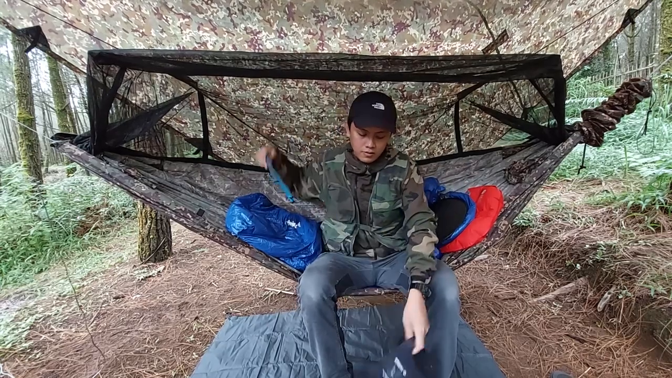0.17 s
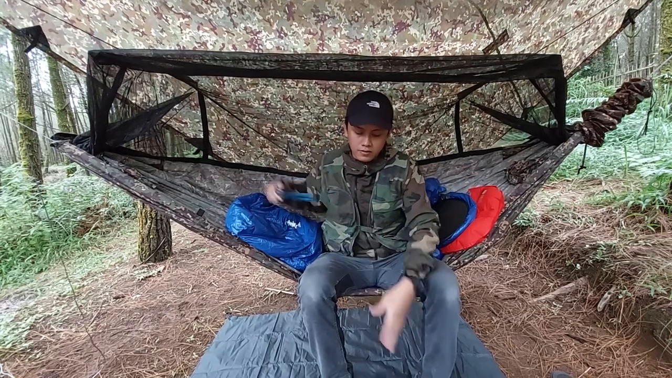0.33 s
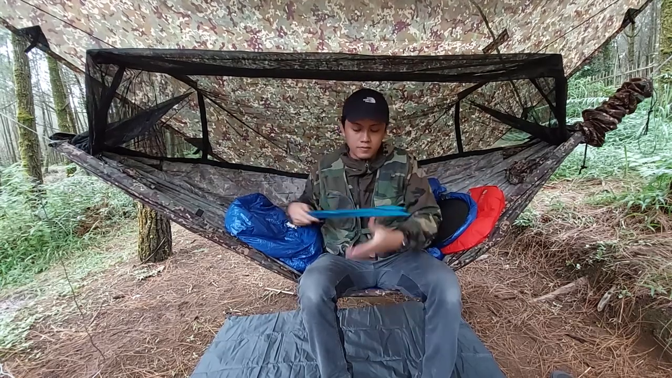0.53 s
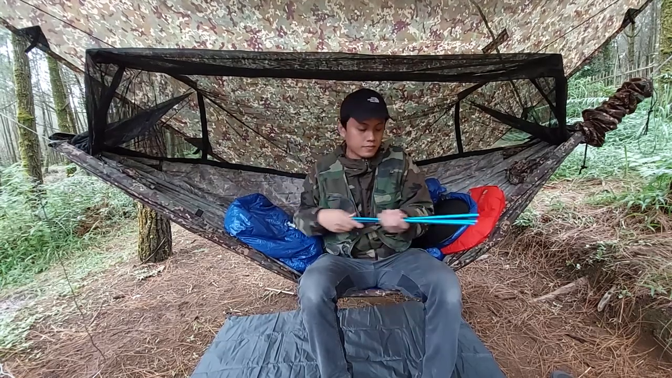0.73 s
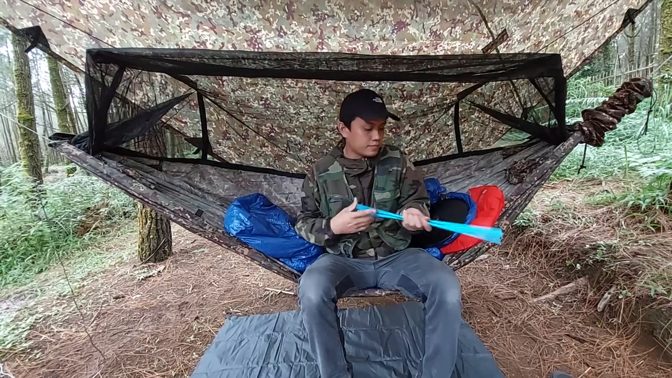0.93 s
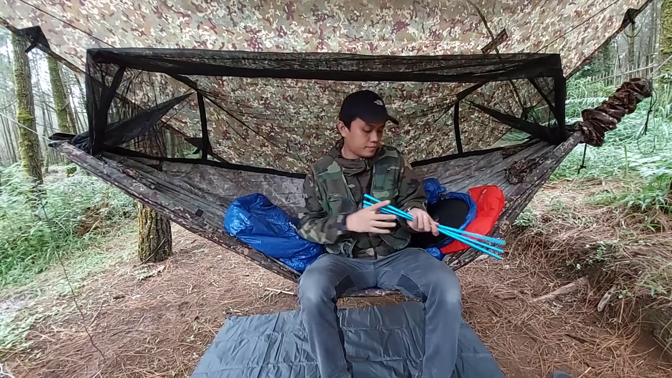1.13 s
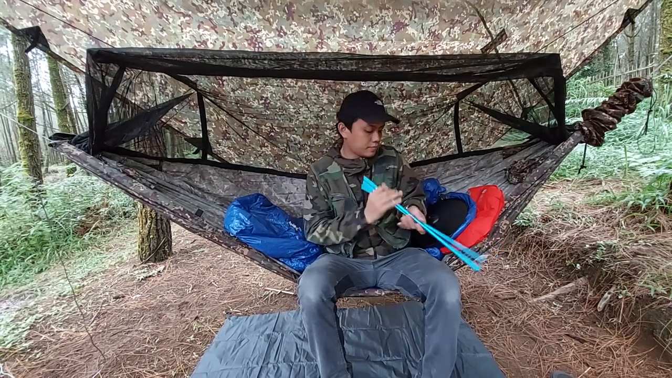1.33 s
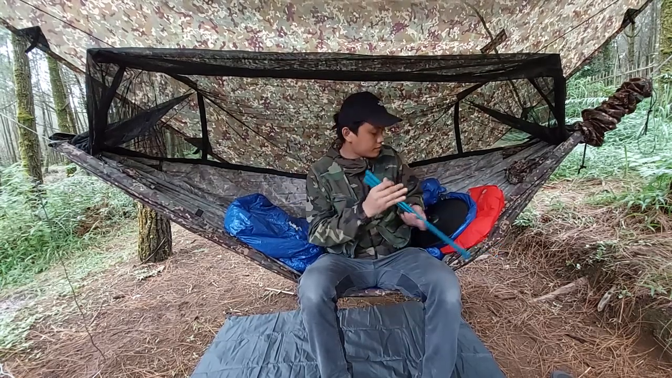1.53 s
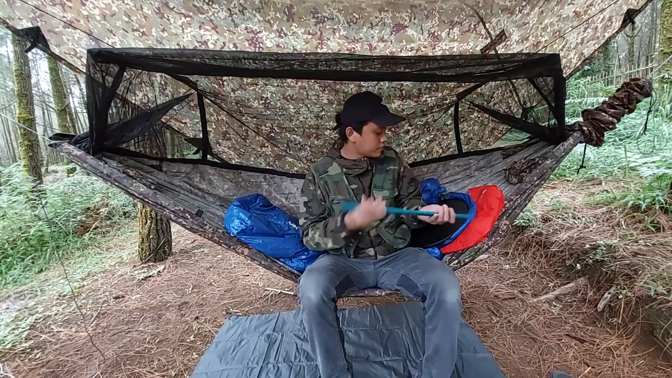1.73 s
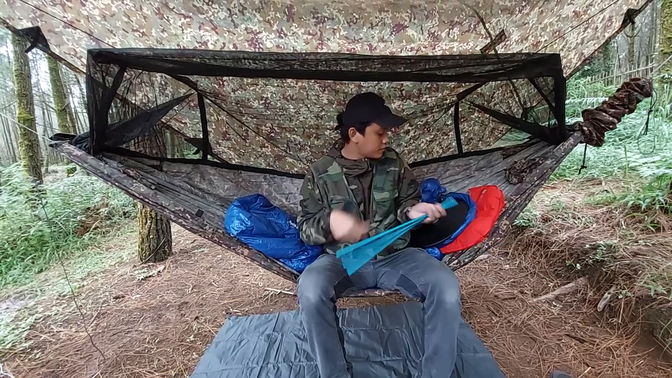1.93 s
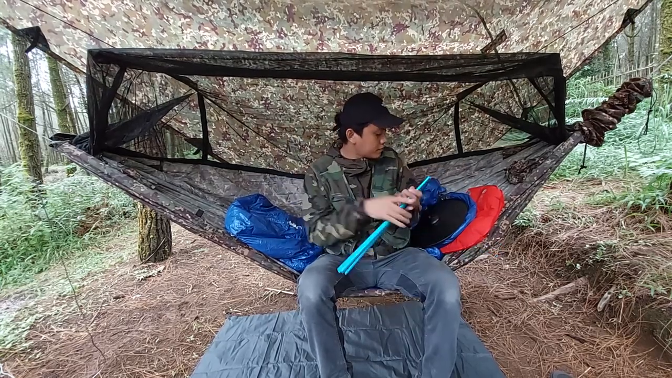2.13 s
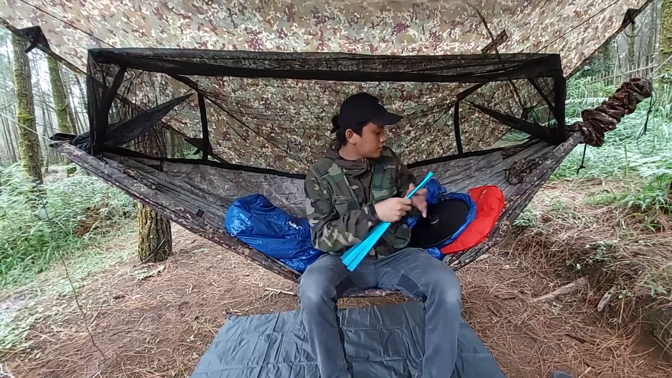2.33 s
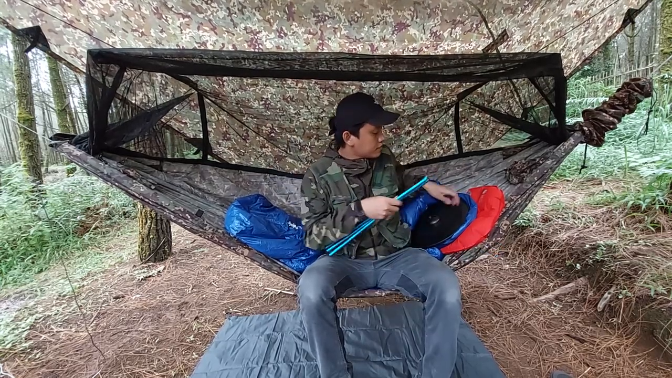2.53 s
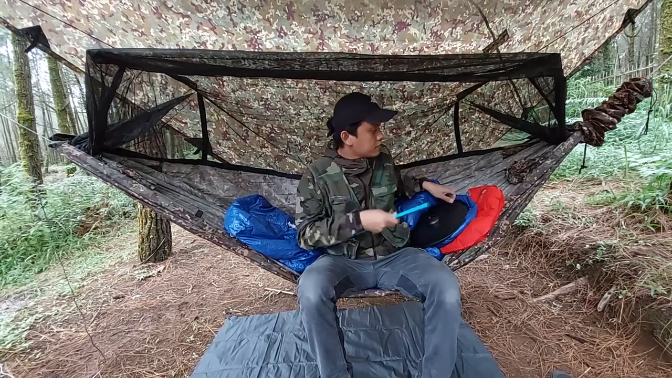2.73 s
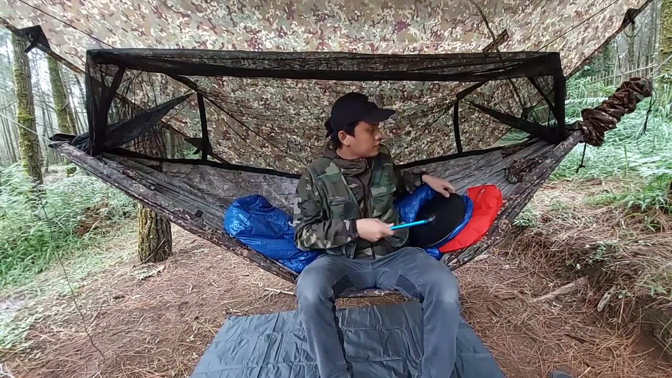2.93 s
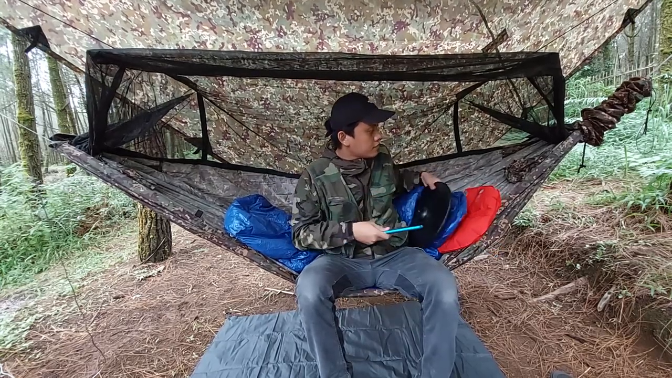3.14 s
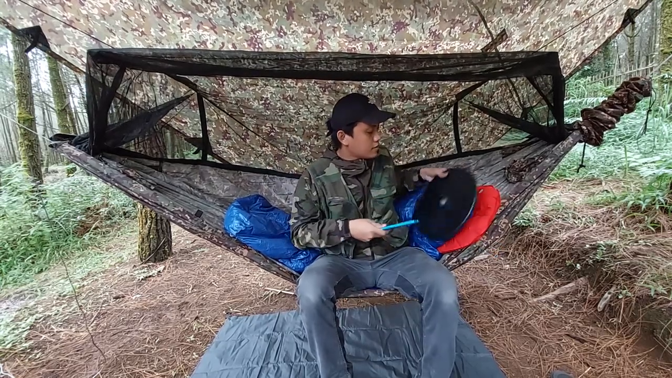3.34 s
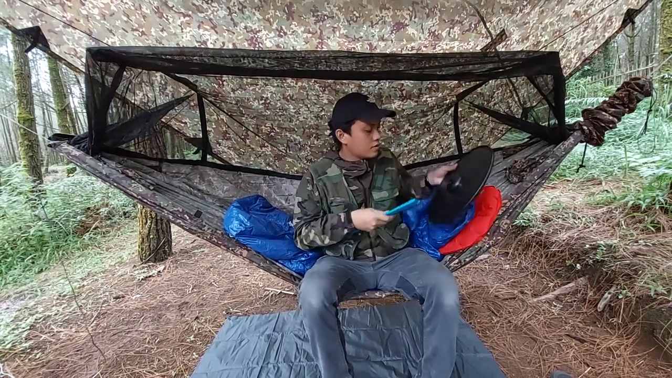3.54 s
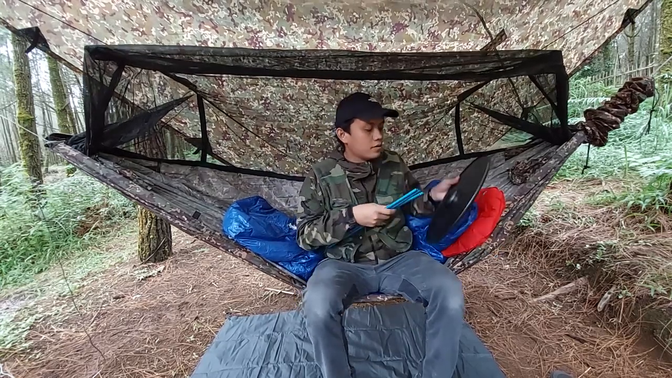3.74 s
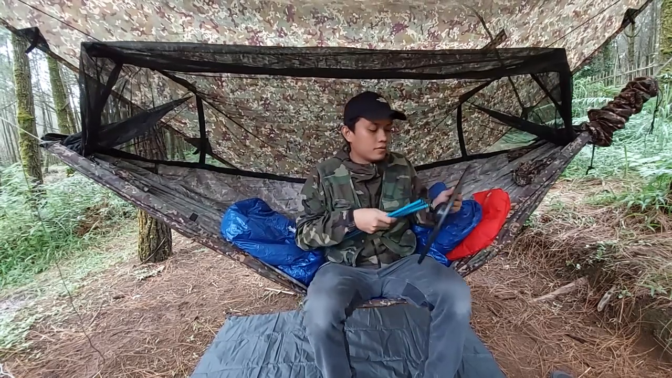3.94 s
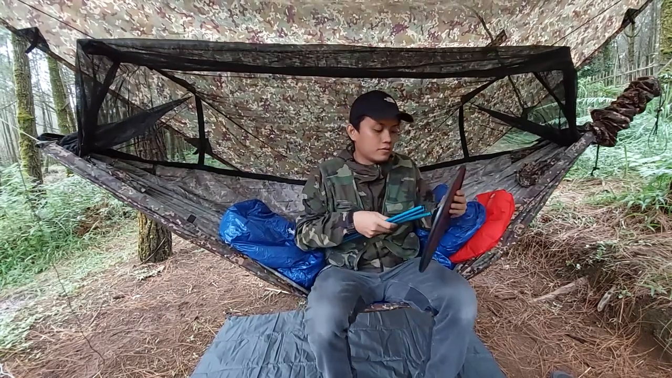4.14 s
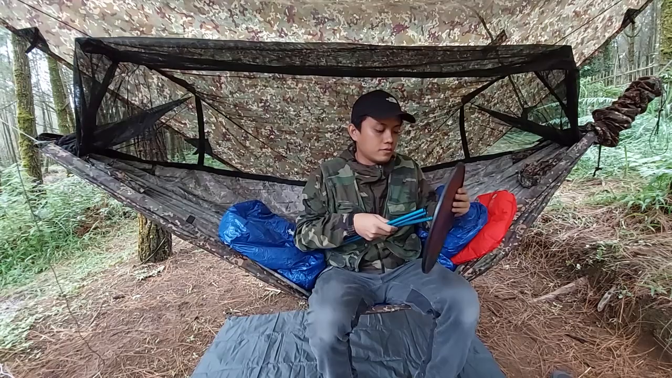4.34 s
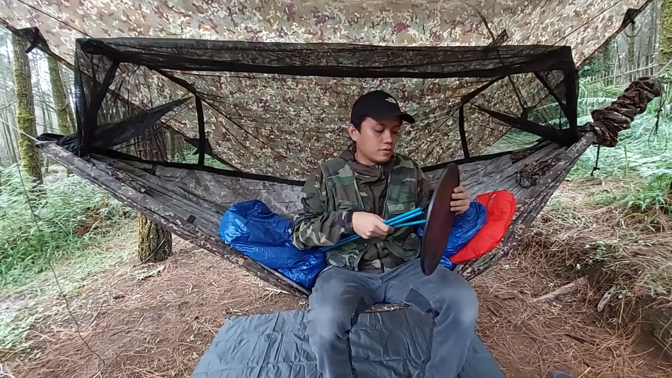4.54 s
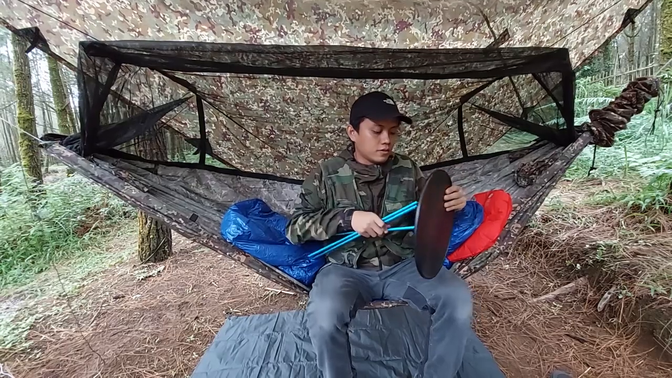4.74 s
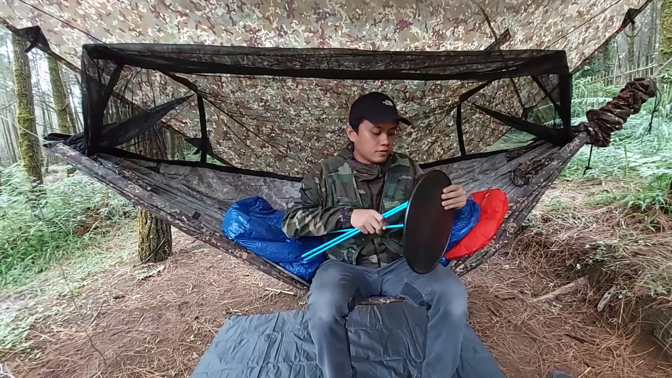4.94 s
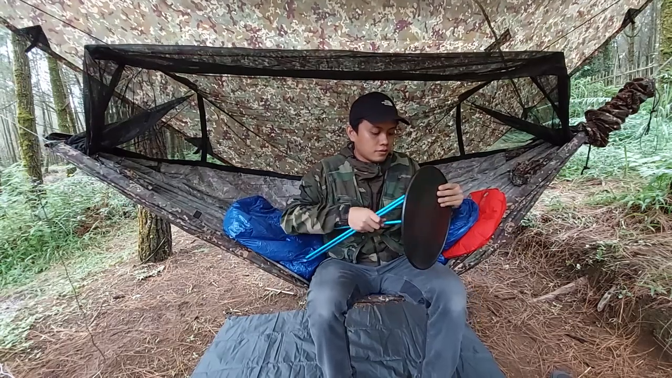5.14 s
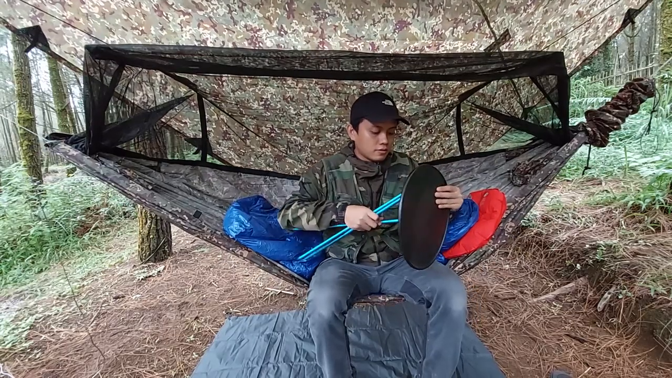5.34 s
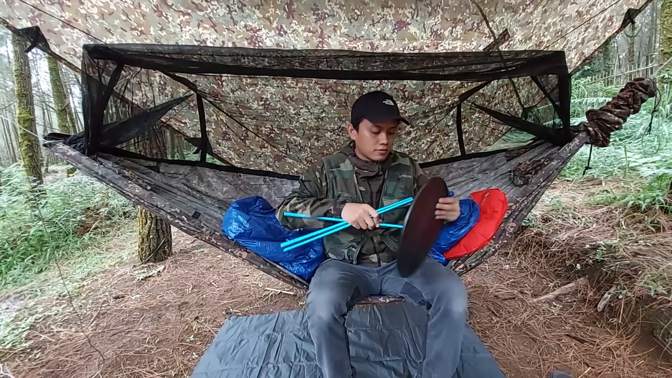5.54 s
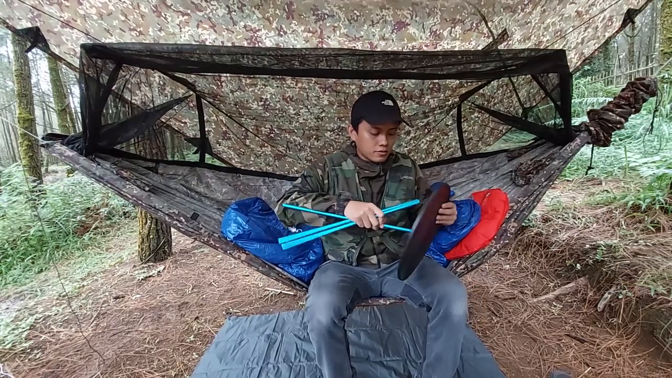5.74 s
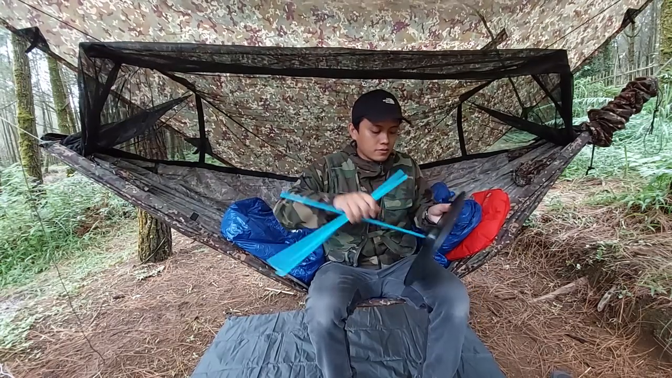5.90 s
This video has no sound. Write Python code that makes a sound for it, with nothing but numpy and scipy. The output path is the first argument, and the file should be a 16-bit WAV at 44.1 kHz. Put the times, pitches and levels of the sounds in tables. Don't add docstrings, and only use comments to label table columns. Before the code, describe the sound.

Close, dry outdoor sound of a small table being put together: a crisp cloth flick, a short metallic rattle, a run of sharp ringing pole clacks, then a few ticks and hollow plastic knocks, the last pair clear near the end. Fabric shifts softly throughout. Around it lies a continuous far insect chorus, a faint passing motor, weak bird calls and low wind; mono microphone.

```python
import sys
import numpy as np
from scipy import signal
from scipy.fft import rfft, irfft
from scipy.io import wavfile

SR = 44100
rng = np.random.default_rng(int(sys.argv[2]) if len(sys.argv) > 2 else 0)


def transcribe(u):
    v = np.clip(np.atleast_2d(u).T, -1, 1)
    q = np.round(v * 32767).astype(np.int16)
    wavfile.write(sys.argv[1], SR, q)


def amplitude_ratio(level_db):
    exponent = np.asarray(level_db, float) / 20
    return 10 ** exponent


N = 263277


def in_time(rows):
    s, *columns = np.transpose(rows)
    return [np.interp(np.arange(N) / SR, s, c) for c in columns]


def rms_one(x):
    return x / np.sqrt(np.mean(x ** 2) + 1e-20)


def drift(rate):
    r = np.exp(-80 * np.pi * rate / SR)
    slow = signal.lfilter([1], [1, -2 * r, r * r], rng.standard_normal(N // 40 + 2002))[2000:]
    return np.interp(np.arange(N) / 40, np.arange(len(slow)), rms_one(slow))


def resonance(x, hz, width):
    r = np.exp(-np.pi * width / SR)
    b = np.array([1, 0, -1]) * (1 - r * r) / 2
    return signal.lfilter(b, [1, -2 * r * np.cos(2 * np.pi * hz / SR), r * r], x)


def sharp_resonance(x, hz, width):
    return resonance(resonance(x, hz, width), hz, width)


def high_pass(x, hz):
    return signal.sosfilt(signal.butter(4, hz, "high", fs=SR, output="sos"), x)


def swell(start, length, level_db):
    s = start + length * np.array([0, 0.31, 1])
    edge_db = level_db - 13.5
    return amplitude_ratio(np.interp(np.arange(N) / SR, s, [edge_db, level_db, edge_db], left=-400, right=-400))


def add(out, s, sound, peak_db):
    at = round(s * SR)
    sound = sound[:N - at]
    out[at:at + len(sound)] += sound * amplitude_ratio(peak_db) / np.max(np.abs(sound))


def strike(hz, level_db, t60, chatter, crack_db, crack_hz):
    t = np.arange(int(.2 * SR)) / SR
    touch = rng.standard_normal(len(t)) ** 3 * np.exp(-(t / max(chatter, 1e-4)) ** 2)
    touch[0] += 11.0
    spin = np.exp(2j * np.pi * hz * t[:1200, None])
    drive = np.abs(np.cumsum(touch[:1200, None] * spin, axis=0)).max(axis=0)
    decay = amplitude_ratio(-60 * t[:, None] / t60)
    body = (amplitude_ratio(level_db) / drive * decay * np.sin(2 * np.pi * hz * t[:, None])).sum(axis=1)
    rung = signal.fftconvolve(touch, body)[:len(t)]
    crack = touch + 2.6 * rng.standard_normal(len(t)) * np.exp(-t / (0.006 + chatter / 2))
    crack = sharp_resonance(crack, crack_hz, crack_hz * 0.75)
    return rung / np.max(np.abs(rung)) + amplitude_ratio(crack_db) * crack / np.max(np.abs(crack))


# (time [s], peak level [dB], chatter [s], loudest mode [Hz], high modes [dB])
POLE_CLACKS = [(1.339, -46, .0035, 8300, -7), (1.371, -52, .0026, 12200, 6), (1.708, -21.5, 0.004, 6900, 2),
               (1.49, -40.5, 0.01, 4300, -3), (1.742, -41, .02, 4400, -12), (1.768, -32, 0.0052, 7000, -4),
               (1.822, -45, 0.0048, 5530, -12), (1.867, -45, 0.0033, 12600, 6),
               (1.889, -33.5, 0.005, 6700, 4), (1.9405, -18.5, 0.0039, 5030, 7),
               (1.979, -39, .003, 5100, -8), (2.007, -13.5, 0.0027, 5320, -1.5),
               (2.155, -46.5, 0.0055, 5790, -25), (2.201, -31, 0.027, 4266, -8),
               (2.216, -22, 0.014, 6730, 2), (4.9977, -41, 0.0019, 4140, -20),
               (2.311, -29.5, .01, 5900, -14), (2.368, -25.5, .0027, 6540, 6),
               (2.3732, -14, .0001, 5370, 11), (2.388, -5.5, 0.0057, 6720, 1.5),
               (2.412, -18.5, 0.0075, 2610, 0), (2.721, -30, 0.0023, 11750, 3.5),
               (2.86, -46.5, 0.018, 5140, -14), (4.172, -34, 0.00228, 6850, -9)]
# (time [s], peak level [dB], chatter [s])
FREE_RATTLES = [
    (.844, -32.5, 0.006),
    (.8505, -21.5, 0.019),
    (.875, -32.5, 0.055),
]
# (frequency [Hz], level [dB], t60 [s])
TUBE_MODES = [(732, -36, .12), (1448, -17, .2), (2449, -14, .18), (3585, -1, .13), (5001, -2, .09),
              (5300, -5, .08), (6370, -6, .08), (6580, -1, .085), (6720, -5, .08), (7420, -12, .065),
              (8253, -8, .065), (10030, -7, .06), (12310, -3, .085), (14140, -6, .065)]
TUBE_SIZES = [0.94, 1.0, 1.026]


def poles():
    out = np.zeros(N)
    hz, level_db, t60 = np.transpose(TUBE_MODES)
    free_db = level_db + 11 * (hz < 2000) + 5 * (hz < 3000)
    for s, peak_db, chatter in FREE_RATTLES:
        rattle = strike(hz, free_db, t60 * 1.1, chatter, crack_db=-14, crack_hz=9000)
        add(out, s, high_pass(rattle, 2400), peak_db)
    grip_s = .892
    out = out * amplitude_ratio(-1600 * np.maximum(np.arange(N) / SR - grip_s, 0))

    hz = np.outer(TUBE_SIZES, hz).ravel()
    level_db = np.tile(level_db, 3) - 16 * (hz < 4000)
    t60 = np.tile(np.minimum(t60, .075), 3)
    for s, peak_db, chatter, loud_hz, high_db in POLE_CLACKS:
        wall_hz = rng.uniform(3800, 14500, 30)
        all_hz = np.r_[hz, wall_hz, loud_hz]
        all_db = np.r_[level_db, np.full(len(wall_hz), -13.0), 10]
        all_db = all_db + high_db * (all_hz > 9000) + rng.normal(0, 3.5, len(all_hz))
        all_t60 = np.r_[t60, np.full(len(wall_hz), .05), .08] * 0.45
        clack = strike(all_hz, all_db, all_t60, chatter, crack_db=-10 + high_db / 2, crack_hz=7800)
        add(out, s, high_pass(clack, 2790), peak_db)
    return out


# (start [s], length [s], level [dB])
HAND_SLIDES = [
    (.74, 0.11, -64),
    (.95, 0.33, -68),
    (1.37, 0.32, -60),
    (1.64, 0.18, -58.5),
    (1.715, 0.18, -59),
    (2.3, 0.24, -55.5),
    (2.45, 0.55, -61),
]


def slide_gain():
    return sum(swell(*slide) for slide in HAND_SLIDES)


def slides():
    grit = rng.standard_normal(N) ** 3 * amplitude_ratio(3.5 * drift(40))
    sung = np.zeros(N)
    for mode_hz, level_db, t60 in TUBE_MODES:
        if mode_hz > 3000:
            for size in TUBE_SIZES:
                hz = mode_hz * size
                sung += amplitude_ratio(level_db * 0.75) * resonance(grit, hz, hz * 0.017)
    return rms_one(sung) * slide_gain()


# (time [s], peak level [dB], boom level [dB], loudest mode [Hz], chatter [s])
TOP_KNOCKS = [(2.72, -33.5, 5.5, 310, 0.0056), (4.165, -26.5, -15.5, 2670, 0.0017),
              (4.299, -48, -5, 1505, 0.0072), (4.421, -34, 3, 2120, 0.0019), (4.438, -45, 8, 320, .0071),
              (4.479, -38, -11, 1810, 0.0018), (4.994, -46.5, 14, 300, .004),
              (5.0356, -22, 4, 1950, 0.0027), (5.702, -22, -2, 1320, 0.00071),
              (5.7199, -15, 1, 1220, 0.0049), (5.924, -63, -9, 2050, 0.0019)]
# (frequency [Hz], level [dB], t60 [s])
DISC_MODES = [(222, -25, 0.0088), (287, -2.5, 0.17), (333, -1.5, 0.11), (440.4, -11, 0.053),
              (555, -7.5, 0.024), (665, -8.5, 0.068), (960, -21, 0.068), (1129, -15.5, 0.13),
              (1389.5, -1.5, .04), (1660, 6, 0.009), (1770, -29, 0.024), (1980, -13, 0.04),
              (2600, -4, 0.072), (2820, -41, 0.03), (3390, -17, 0.055), (3160, -1, 0.027),
              (3830, -38, 0.012), (4400, 0, 0.037)]


def table_top():
    out = np.zeros(N)
    hz, level_db, t60 = np.transpose(DISC_MODES)
    for s, peak_db, boom_db, loud_hz, chatter in TOP_KNOCKS:
        tick_db = 1.5 - 4.5 * chatter / 0.00084
        colour_db = boom_db * (hz < 800) + tick_db / 2 * (hz > 2200) + rng.normal(0, 2.5, len(hz))
        damping = .6 if s > 5.5 else .85
        all_db = np.r_[level_db + colour_db, 1.6]
        all_t60 = np.r_[t60 * damping, .034]
        knock = strike(np.r_[hz, loud_hz], all_db, all_t60, chatter, crack_db=tick_db, crack_hz=3080)
        add(out, s, high_pass(knock, 237), peak_db)
    return out


# (time [s], peak level [dB], rise [s], fall [s], centre [Hz])
BAG_CRUMPLES = [(0.356, -36, .0007, 0.013, 3420), (0.362, -25, 0.0016, 0.009, 3050),
                (0.375, -12, 0.0045, 0.0087, 2260), (0.383, -23.5, 0.0066, 0.007, 4540),
                (0.436, -41, 0.011, 0.079, 2600), (0.476, -46, 0.094, 0.021, 1600),
                (0.585, -35.5, 0.00096, 0.011, 2510), (1.442, -48.5, 0.013, 0.032, 330),
                (1.52, -57, 0.035, 0.099, 520), (1.6, -64, 0.02, 0.028, 597),
                (1.77, -58.5, 0.11, 0.038, 446), (2.55, -60, 0.096, 0.048, 725),
                (2.731, -42, 0.005, 0.012, 12000), (3.19, -51, 0.018, 0.026, 12100),
                (3.41, -48, 0.026, 0.028, 12100), (3.272, -54, 0.035, 0.092, 270),
                (3.6, -52.5, 0.023, 0.04, 247), (5.5, -55, 0.035, 0.085, 336)]
# (time [s], peak level [dB], half length [s], frequency [Hz])
FRAME_JOLT = (2.571, -29, .011, 92)


def bag():
    out, t = np.zeros(N), np.arange(-.05 * SR, .15 * SR) / SR
    for s, peak_db, rise, fall, centre_hz in BAG_CRUMPLES:
        snaps = rng.standard_normal(len(t)) * amplitude_ratio(5.1 * np.minimum(rng.exponential(1, len(t)), 4))
        dull = resonance(snaps, centre_hz, centre_hz * 0.35)
        if centre_hz > 1000:
            cloth = dull + amplitude_ratio(-25.5) * snaps
        else:
            cloth = resonance(dull, centre_hz, centre_hz * 0.59)
        add(out, s + t[0], cloth * np.exp(np.where(t < 0, t / rise, -t / fall)), peak_db)
    s, peak_db, half, jolt_hz = FRAME_JOLT
    add(out, s + t[0], -np.cos(2 * np.pi * jolt_hz * t) * np.exp(-(t / half) ** 2), peak_db)
    return out


def under_tarp(x):
    t = np.arange(int(.08 * SR)) / SR
    wash = resonance(rng.standard_normal(len(t)), 1400, 8100) * amplitude_ratio(-60 * t / 0.09) * (t > .002)
    return signal.fftconvolve(x, wash / np.sqrt(np.sum(wash ** 2)))[:N]


def coloured(spectrum, patchy_db):
    hz, level_db = np.transpose(spectrum)
    grid = np.arange(N // 2 + 1) * SR / N + 1
    shape = amplitude_ratio(np.interp(np.log(grid), np.log(hz), level_db, left=-90, right=-90))
    return rms_one(irfft(rfft(rng.standard_normal(N)) * shape, N) * amplitude_ratio(patchy_db * drift(15.0)))


# (start [s], length [s], level [dB])
SITTER_SHIFTS = [
    (0, 1, -82),
    (0.876, 0.26, -79),
    (1.4, 0.22, -94),
    (1.803, 0.59, -74),
    (2.288, 0.61, -60),
    (3.304, 0.64, -70.5),
    (4.226, 0.16, -69),
    (5.004, 0.14, -65),
    (5.746, 0.11, -61.5),
]
# (frequency [Hz], level [dB per Hz])
RUSTLE_SPECTRUM = [(210, -29), (350, -2.5), (729, -4), (1030, -8.5), (1490, -6.5), (1880, -18.5),
                   (2400, -10.5), (3120, -20), (5280, -120)]


def rustle():
    return (amplitude_ratio(-77.5) + sum(swell(*shift) for shift in SITTER_SHIFTS)) * coloured(RUSTLE_SPECTRUM, patchy_db=-3.5)


# (frequency [Hz], level [dB per Hz])
SHEEN_SPECTRUM = [(2000, -49), (5000, 49), (9000, -46), (13000, 55), (15500, -10), (17000, -22)]


def sheen():
    return (amplitude_ratio(-80) + amplitude_ratio(-11) * slide_gain()) * coloured(SHEEN_SPECTRUM, patchy_db=-3.0)


# (time [s], level [dB])
CICADA_LEVEL = [
    (0, -88),
    (2.5, -86),
    (3.2, -78),
    (4.2, -76.5),
    (5.97, -76),
]


def cicada():
    t = np.arange(N) / SR - 2.795
    level_db, = in_time(CICADA_LEVEL)
    throb = .5 + .5 * np.cos(2 * np.pi * (12.85 * t + .54 * t ** 2 / 2))
    beat = .5 + .5 * np.cos(2 * np.pi * np.cumsum(251 * (1 + 0.016 * drift(5.5))) / SR)
    clicks = rng.standard_normal(N) * beat ** 2 * (.12 + throb)
    high = sharp_resonance(clicks, 13750, 1300)
    low = sharp_resonance(clicks, 10600, 1400)
    return amplitude_ratio(level_db) * rms_one(high + amplitude_ratio(-9.0) * low)


# (frequency [Hz], width [Hz], level [dB])
CICADA_DRUMS = [(2510, 890, -10), (3253, 730, -1.5), (3740, 440, 1), (4920, 1280, -9.5), (6585, 460, -13),
                (7136, 480, -10), (10740, 1060, -12.5), (14000, 1100, -20)]


def chorus():
    out = np.zeros(N)
    for hz, width, level_db in CICADA_DRUMS:
        band = sharp_resonance(rng.standard_normal(N), hz, width * 1.17)
        out += amplitude_ratio(level_db + 1.2 * drift(18)) * rms_one(band)
    return amplitude_ratio(-55 + 0.81 * drift(2.6)) * rms_one(out)


# (time [s], firing rate [per s], load level [dB])
ENGINE_RUN = [(0.0, 37.4, -51.5), (0.16, 40.5, -58), (0.63, 44, -52.5), (1.71, 43, -58), (1.88, 45.6, -54),
              (2.49, 43.7, -52.5), (2.71, 39.2, -58.5), (3.14, 37.5, -55.5), (4.87, 40.6, -70),
              (5.12, 39.3, -57.5), (5.29, 40, -55), (5.97, 40.5, -68)]
# (level at mean load [dB], share of the load swing [1])
EXHAUST_ORDERS = [(-58, 1.8), (-55, 1.65), (-65, 0.77)]


def engine():
    rate, load_db = in_time(ENGINE_RUN)
    turn = 2 * np.pi * np.cumsum(rate * (1 + 0.01 * drift(7.7))) / SR
    geared_db = 7 * (np.arange(N) > 2.4 * SR)
    out = np.zeros(N)
    for k, (order_db, share) in enumerate(EXHAUST_ORDERS, 1):
        level_db = order_db + share * (load_db + 57) + geared_db * (k == 3)
        out += amplitude_ratio(level_db + 3.8 * drift(13.7)) * np.sin(k * turn)
    return out


# (start [s], length [s], pitch [Hz], level [dB], throat resonance [Hz])
FOWL_CALLS = [
    (2.155, 0.26, 361.6, -75, 1410),
    (2.376, .32, 373.8, -67, 1460),
    (2.86, .24, 380.5, -75, 1600),
    (3.321, 0.3, 393, -66.5, 2060),
    (3.62, .27, 390, -70, 1460),
]


def far_calls():
    out, t = np.zeros(N), np.arange(N) / SR
    for start, length, pitch, level_db, throat in FOWL_CALLS:
        pitch = pitch - 12 * (t - start - length / 2)
        turn = 2 * np.pi * np.cumsum(pitch * (1 + .013 * drift(40))) / SR
        envelope = np.sqrt(swell(start, length, 2 * level_db))
        for k in range(1, 7):
            gain = amplitude_ratio(-15.5) + amplitude_ratio(-6) * (k == 2) + np.exp(-((k * pitch - throat) / 220) ** 2)
            out += envelope * amplitude_ratio(3.5 * drift(30)) * gain * np.sin(k * turn)
    return out


# (time [s], level [dB])
BREEZE_LEVEL = [(0.0, -68.5), (0.65, -64.5), (1.1, -60.5), (2.29, -67.5), (2.59, -62.5), (3.04, -67.5),
                (3.47, -58.5), (3.97, -66.5), (4.39, -68), (4.92, -70.5), (5.2, -63.5), (5.97, -69.5)]
# (frequency [Hz], level [dB per Hz])
RUMBLE_SPECTRUM = [(15, -35), (25, -4), (81, 3), (124, -2), (179, -10), (246, -11), (312, -18.5),
                   (560, -43.5), (700, -61), (910, -39), (1540, -120)]


def breeze():
    level_db, = in_time(BREEZE_LEVEL)
    return amplitude_ratio(level_db + 11) * coloured(RUMBLE_SPECTRUM, patchy_db=2.0)


def scene():
    near = poles() + slides() + table_top() + bag()
    near = near + amplitude_ratio(-11.5) * under_tarp(near)
    cloth = rustle() + sheen()
    forest = cicada() + chorus() + engine() + far_calls() + breeze()
    return (near + cloth + forest)[None]


def roll_off(x):
    return signal.sosfilt(signal.butter(12, 16990, fs=SR, output="sos"), x)


def record(dry):
    mix = high_pass(dry, 36)
    mix = signal.sosfilt(signal.cheby2(12, 24, 16050, "low", fs=SR, output="sos"), mix)
    return roll_off(mix)


dry = scene()
out = record(dry)
transcribe(out)
```